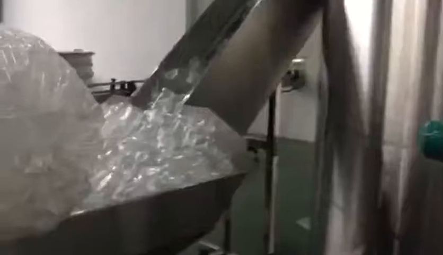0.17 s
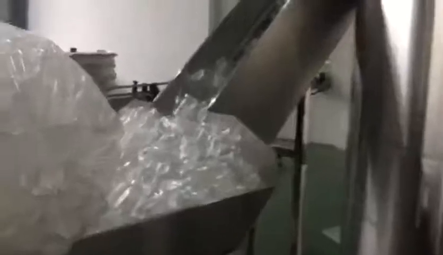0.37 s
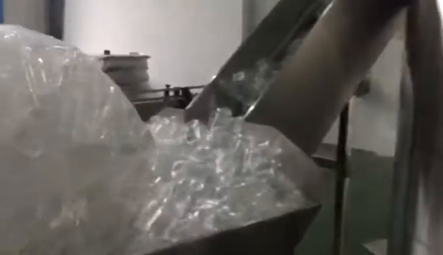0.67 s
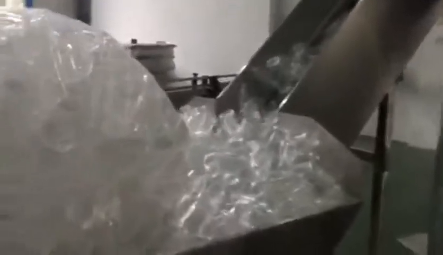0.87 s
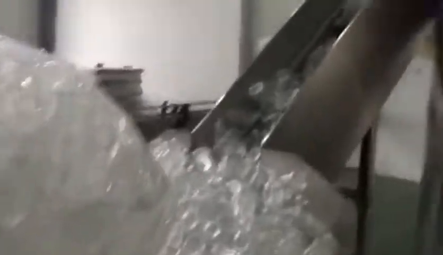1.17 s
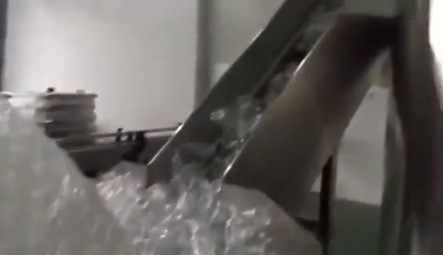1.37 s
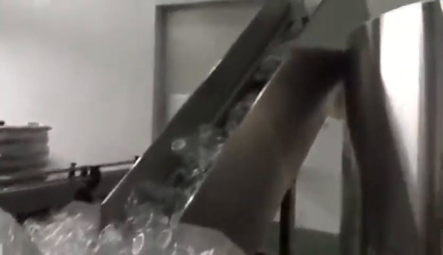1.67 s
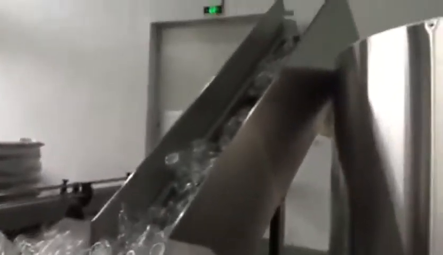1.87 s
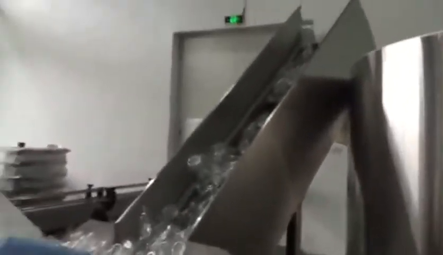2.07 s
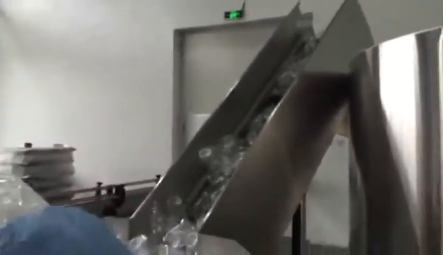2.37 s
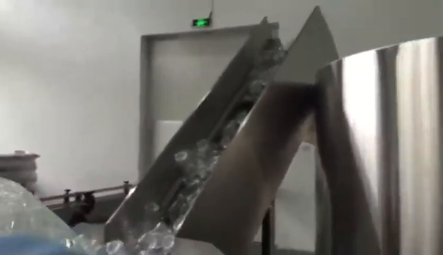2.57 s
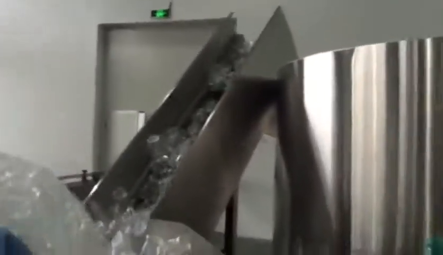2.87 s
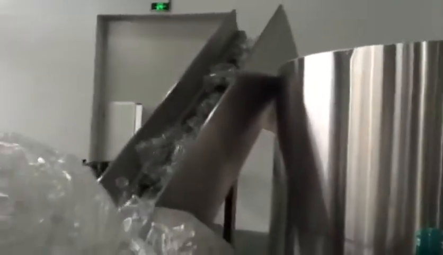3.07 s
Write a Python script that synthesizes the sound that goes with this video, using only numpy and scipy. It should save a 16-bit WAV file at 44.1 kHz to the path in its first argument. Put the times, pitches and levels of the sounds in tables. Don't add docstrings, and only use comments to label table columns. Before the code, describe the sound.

Hollow plastic bottles clatter and knock against ringing sheet steel in an echoing, roaring factory hall

```python
import sys
import numpy as np
from scipy import signal
from scipy.io import wavfile
from scipy.ndimage import uniform_filter1d

SR = 44100
rng = np.random.default_rng(int(sys.argv[2]) if len(sys.argv) > 2 else 0)


def transcribe(u):
    v = np.clip(np.atleast_2d(u).T, -1, 1)
    q = np.round(v * 32767).astype(np.int16)
    wavfile.write(sys.argv[1], SR, q)


def volts(x):
    e = np.asarray(x, float) / 20
    return 10 ** e


N = 141561


def evened(x):
    return x / np.sqrt(np.mean(x ** 2) + 1e-20)


def read(points, hz):
    f, value = np.transpose(points)
    return np.interp(np.log(hz + 1), np.log(f + 1), value)


def bursts(times, db, t60):
    t = np.arange(N) / SR - np.array(times)[:, None]
    on = t > 0
    on[0] = True
    decay_db = np.array(db)[:, None] - 60 * np.maximum(t, 0) / t60
    power = on * volts(2 * decay_db)
    return np.sqrt(power.sum(0))


def train(per_s, spread_db):
    chance, side, size = rng.random((3, N))
    click = (chance < per_s / SR) * np.sign(side - .5)
    return click * volts(spread_db * np.minimum(-np.log(size + 1e-9), 4))


def ring(modes, per_s, spread_db, strength, blows=0):
    detune = .012
    t, out = np.arange(SR // 3) / SR, np.zeros(N)
    for spot in range(10):
        mix = rng.standard_normal((len(modes), 2))
        body = np.zeros(len(t))
        for (hz, db, t60), (a, b) in zip(modes, mix):
            decay = volts(db - 60 * t / np.clip(t60, .05, .32))
            tone = np.sin(2 * np.pi * hz * (1 + detune * b) * t)
            body += (np.sign(a) + 0.29 * a) * decay * tone
        hits = train(per_s / 10, spread_db) + blows * rng.choice([-1, 1], N)
        out += signal.fftconvolve(hits * strength, body / np.linalg.norm(body))[:N]
    return out / np.sqrt(per_s / SR) / 2


# pitch_hz, level_db (per Hz)
ROAR_SPECTRUM = [(15, -51), (25, -15.5), (163, 0), (265, 5), (454, -4.5), (702, -1.5), (1640, -7),
                 (4340, -8.5), (11500, -16.5), (15000, -52), (22000, -120)]
ROAR_DB = -17.5


def roar():
    frames, hz = N // 128 + 5, np.fft.rfftfreq(512, 1 / SR)
    a, b, patches = rng.standard_normal((frames, 257, 3)).T
    patches = evened(uniform_filter1d(uniform_filter1d(patches, 6, 0), 24, 1))
    flicker = evened(uniform_filter1d(rng.standard_normal(frames), 12))
    level_db = read(ROAR_SPECTRUM, hz)[:, None] + 1.7 * patches + 0.42 * flicker
    noise = signal.istft((a + 1j * b) * volts(level_db), nperseg=512, noverlap=384)[1][:N]
    return volts(ROAR_DB) * evened(noise)


# start_s, peak_db, body_hz
CLOSE_KNOCKS = [(.6347, -24, 2140), (.7544, -18, 2500), (.775, -14.5, 2380), (1.043, -14, 2540),
                (1.1146, -17.5, 5240), (1.119, -11, 1090), (1.2935, -13.5, 3200), (1.3211, -20, 2110),
                (1.6695, -17.5, 2410), (1.9277, -16.5, 1820), (1.93, -16.5, 5800), (2.03, -18, 3000),
                (2.2111, -21, 3244), (2.3734, -15, 1590), (2.597, -21, 1740), (2.6396, -22, 2480),
                (2.7529, -21, 2050), (2.92, -25, 3150), (3.0949, -14, 1910), (3.1415, -20, 2180),
                (.110, -10.5, 700), (1.345, -15, 2600), (1.364, -21, 2000), (1.965, -20, 5540),
                (2.001, -16.5, 5560), (2.397, -12.5, 607), (2.312, -14, 1300), (.42, -16, 2300)]
CLOSE_T60_S, CLOSE_WIDTH = 0.078, 1.22


def knocks():
    t, out = np.arange(SR // 8) / SR, np.zeros(N + SR)
    for s, db, hz in CLOSE_KNOCKS:
        edges = [hz / CLOSE_WIDTH, hz * CLOSE_WIDTH]
        band = signal.butter(2, edges, "band", fs=SR, output="sos")
        rattle = evened(signal.sosfilt(band, rng.standard_normal(len(t))))
        out[round(s * SR):][:len(t)] += rattle * volts(db - 60 * t / CLOSE_T60_S)
    return out[:N]


# start_s, peak_db, thin_against_thick_walls_db
BANGS = [(0.116, -10.5, 1), (0.226, -10, -4), (0.328, -8.5, 4.5), (0.481, -37, -11), (0.626, -16, 9.5),
         (0.73, -21, 15), (0.94, -17, -10), (1.118, -4, -3), (1.199, -8.5, 1), (1.32, -3, 1.5),
         (1.499, -7.5, 1), (1.64, -6, 0.5), (1.689, -23, -5), (1.781, -5.5, -1), (1.937, -2.5, -3),
         (1.963, -26, 6), (2.008, -23, -14), (2.053, -15, -8), (2.19, -9.5, -3), (2.327, -3.5, 0),
         (2.369, -15.5, -17), (2.46, -4.5, 3), (2.52, -9, 0), (2.606, -6, -8), (2.773, -6, -1.5),
         (2.849, -10.5, 4), (2.89, -10, -1), (3.09, -7.5, -1.5)]
# time_s, level_db
LOAD = [(0.12, -18), (0.26, -53), (0.4, -19), (0.43, -47), (1.09, -40), (1.14, -22), (1.61, -20),
        (1.7, -14), (1.75, -22), (1.91, -16), (1.98, -18), (2.03, -31), (2.08, -26), (2.38, -15.5),
        (2.78, -27.5), (2.88, -12), (3.09, -40), (3.2, -10.5)]
# pitch_hz, level_db, t60_s
WALL_MODES = [(425, -7, 0.14), (523, -3, 0.2), (581.2, -7.5, 0.21), (603.7, 0.5, 0.074), (701.3, 0.5, 0.39),
              (731, -13, 0.45), (765, -7, 0.6), (840, 2, 0.087), (917.8, -1, 0.22), (982, 3, 0.073),
              (1073, 0.5, 0.038), (1247, -11.5, 0.37), (1261, -6.5, 0.17), (1319, -9, 0.38)]
# pitch_hz, level_db, t60_s
PANEL_MODES = [(140.5, 1, 0.31), (168.4, -1.5, 0.43), (194.4, -3, 0.18), (228.6, 0, 0.33), (246, 5.5, 0.1),
               (291.8, 2.5, 0.24), (346, -5.5, 0.083)]
KNOCKS_PER_S, KNOCK_DB, BANG_DB, BANG_T60_S, DRUM_DB = 500, -31.5, -15.5, 0.3, -5
STRIKE = 2.98


def steel():
    s, db, thin_db = np.transpose(BANGS)
    blows = np.zeros(N)
    blows[(s * SR).astype(int) + 2] = STRIKE / np.sqrt(10)
    walls = np.zeros(N)
    for thinness, modes in ((-0.79, WALL_MODES[:4]), (-0.24, WALL_MODES[4:8]), (0.97, WALL_MODES[8:])):
        bangs = bursts(s, db + BANG_DB + thinness * thin_db, BANG_T60_S)
        walls += ring(modes, KNOCKS_PER_S, 1.96, np.hypot(volts(KNOCK_DB), bangs), blows)
    s, db = np.transpose(LOAD)
    drumming = volts(DRUM_DB + np.interp(np.arange(N) / SR, s, db))
    return walls + ring(PANEL_MODES, 250, 1.95, drumming)


def thuds():
    thud_db, t60_s = -6.5, 0.079
    s, db, _ = np.transpose(BANGS)
    band = signal.butter(2, [220, 1400], "band", fs=SR, output="sos")
    grain = signal.sosfilt(band, rng.standard_normal(N))
    return evened(grain) * bursts(np.r_[0, s], np.r_[-99, db + thud_db], t60_s)


# start_s, peak_db, brightness_db (raises the highest clacks, lowers
SLIDES = [(0.1171, -12, 6.5), (0.198, -5, 0), (0.308, -6, -1), (0.409, -7.5, 3.5), (0.4975, -17.5, 10.5),
          (0.621, -8.5, 1), (0.759, -9, -3), (0.98, -15, -9), (1.1156, -7.5, -2), (1.307, -8.5, -2),
          (1.4494, -19, 10), (1.568, -10.5, -4), (1.791, -8.5, 1.5), (1.924, -5.5, 2), (2.0177, -8.5, 0.5),
          (2.1394, -16, 2), (2.277, -8.5, -3), (2.3094, -16, 3), (2.5794, -30.5, -18), (2.7794, -13, 0),
          (2.931, -13, -4), (3.114, -9.5, -3.5)]
# pitch_hz, level_db (per Hz)
CLACK_SPECTRUM = [(710, -34), (1200, -4), (1340, 1.5), (1420, -29), (1690, 0.5), (3300, -0.5), (4820, -4),
                  (5200, -3.5), (11500, -17), (15000, -46), (22000, -120)]
CLACKS_PER_S, CLACK_SPREAD_DB = 6000, 2.2
CLACK_DB, SLIDE_T60_S, SLIDE_DB = -27.5, 0.6, -8.5


def clatter():
    s, db, tilt_db = np.transpose(SLIDES)
    out, t = np.zeros(N), np.arange(600) / SR
    pitches = np.geomspace(1100, 11500, 24)
    share = volts(read(CLACK_SPECTRUM, pitches)) * np.sqrt(pitches)
    dull, bright = (np.hypot(volts(CLACK_DB), bursts(s, db + SLIDE_DB + side * tilt_db, SLIDE_T60_S))
                    for side in (-1, 1))
    for k, hz in enumerate(pitches):
        clack = np.sin(2 * np.pi * hz * t) * np.exp(-t * hz / 2.4)
        swell = dull + (bright - dull) * k / 23
        part = signal.oaconvolve(train(CLACKS_PER_S / 24, CLACK_SPREAD_DB), clack)[:N]
        out += share[k] * evened(part) * swell
    return out / np.linalg.norm(share)


# start_s, length_s, pitch_hz, level_db
SINGING = [(1.98, 0.36, 608, -28), (2.1, 0.14, 613, -22), (2.26, 0.26, 579, -24), (2.43, 0.16, 721, -20.5),
           (2.84, .17, 745, -20.5), (1.29, .14, 780, -27), (2.34, 0.42, 531, -26.5), (2.32, .17, 219, -22),
           (2.08, 0.25, 245, -27), (2.24, 0.11, 299, -21), (1.8, .14, 270, -25), (1.65, .09, 371, -22.5),
           (1.4, .1, 640, -23), (1.59, 0.13, 1200, -26.5), (1.74, 0.16, 244, -28), (1.95, .13, 180, -22),
           (2.34, .2, 162, -28.5), (2.55, 0.22, 286, -25), (2.54, 0.18, 691, -28), (3.1, 0.25, 219, -24),
           (1.1, 0.23, 691, -26.5), (1.16, 0.11, 972, -25), (1.04, 0.16, 310, -25),
           (1.27, 0.33, 549, -26.5), (2.05, 0.24, 534, -28.5), (0.13, 0.11, 740, -25.5),
           (.31, .1, 715, -25), (2.65, 0.11, 889, -22), (1.93, .1, 822, -24), (3.3, 0.14, 295, -25.5),
           (1.32, 0.24, 240, -28), (0.7, .16, 222, -27.5), (2.29, 0.25, 1200, -25.5),
           (2.46, 0.12, 578, -22)]
SING_WANDER_RAD, SING_FLUTTER_DB, SING_DB = .8, 3.5, -2.5


def singing():
    t, out = np.arange(N) / SR, np.zeros(N)
    for s, length, hz, db in SINGING:
        wander, flutter = (evened(uniform_filter1d(uniform_filter1d(v, size=500), size=500))
                           for v in rng.standard_normal((2, N)))
        tone = np.sqrt(2) * np.sin(2 * np.pi * hz * t + SING_WANDER_RAD * wander)
        swell = np.sqrt(np.sin(np.pi * np.clip((t - s) / length, 0, 1)).clip(0))
        out += volts(db + SING_DB + SING_FLUTTER_DB * flutter) * tone * swell
    return out


def hall(x):
    t60_s = 1
    at, out = np.arange(200, SR - 20, 20), np.zeros(N)
    spot = rng.integers(0, 4, N // 1024 + 1).repeat(1024)[:N]
    for k in range(4):
        taps = np.zeros(SR)
        taps[at + rng.integers(0, 20, len(at))] = rng.choice([-1., 1.], len(at))
        hz, t, z = signal.stft(taps, SR, nperseg=256)
        decay = volts(-60 * t * (1 + hz[:, None] / 6000) / t60_s)
        tail = signal.istft(z * decay, SR, nperseg=256)[1]
        here = np.sqrt(abs(uniform_filter1d((spot == k) * 1., size=512)))
        out += signal.fftconvolve(x * here, tail / np.linalg.norm(tail))[:N]
    return out


def scene():
    steel_direct_db, hall_db = 1.5, -0.5
    walls, bottles = steel(), clatter() + thuds()
    near = volts(steel_direct_db) * walls + bottles + volts(hall_db) * hall(walls + bottles)
    near = near / np.hypot(1, volts(hall_db))
    return np.tile(near + roar() + singing() + knocks(), (2, 1))


# start_s, length_s, level_db
DULL = [(0.152, 0.097, -5), (0.408, 0.048, -4), (0.55, 0.14, -1), (0.834, 0.14, -1.5), (1.045, .1, -1),
        (1.274, 0.078, -1.5), (1.65, 0.068, -2), (1.87, 0.05, -3.5), (2.39, 0.053, -5), (2.774, 0.11, -4)]
# start_s, length_s, pitch_hz, width_hz
HOLES = [(1.57, .055, 3850, 400), (1.6, .06, 2600, 250), (1.65, .06, 1600, 120), (1.95, .055, 3750, 380),
         (1.95, .035, 2350, 400), (1.99, .03, 5000, 300), (1.95, .025, 1850, 120), (2.138, .05, 3430, 300),
         (2.14, .055, 2800, 230), (1.95, .03, 3000, 170), (2.26, .035, 3700, 200), (2.19, .05, 2450, 150),
         (2.53, .06, 3050, 250), (2.575, .055, 2830, 250), (2.74, .008, 4600, 1400),
         (2.412, .014, 5600, 500), (1.46, .02, 3050, 250), (1.475, .02, 4900, 250), (2.67, .04, 4100, 200),
         (2.69, .016, 4950, 400), (2.89, .03, 3800, 250), (3.01, .065, 3000, 220), (3.108, .04, 2970, 260)]
# pitch_hz, width_hz, depth_db
DIPS = [
    (4900, 150, -1.3),
    (7600, 200, -1.8),
    (10450, 250, -2.2),
]
TOP_HZ, EDGE_HZ, WIDE_HZ, WIDE_DB, RAGGED_HZ = 7050, 11650, 12100, -1.5, 120
HOLE_DB, STRAY_HOLES, STRAY_DB, MORE_HOLES_FROM_S = -32, .07, -16, 1.5


def shifting_bands(x):
    hz, t, z = signal.stft(x, SR, nperseg=1024, noverlap=896)
    hz, db = hz[:, None], np.zeros(z.shape)
    wide = np.zeros(len(t))
    for s, length, dull_db in DULL:
        now = (t > s) & (t < s + length)
        db += dull_db * now * np.clip((hz - TOP_HZ) / 200, 0, 1)
        wide += now
    for s, length, mid_hz, width_hz in HOLES:
        now = (t > s) & (t < s + length)
        db += HOLE_DB * (now & (abs(hz - mid_hz) < width_hz / 2))
    cells = rng.random((len(t) // 10 + 1, len(hz) // 3 + 1))
    cells = cells.repeat(10, 0).repeat(3, 1).T[:len(hz), :len(t)]
    frequency_share = np.where((t > MORE_HOLES_FROM_S) & (hz < 4200), 1, .1)
    db += STRAY_DB * (cells < STRAY_HOLES * frequency_share) * (hz > 1400)
    for mid_hz, width_hz, dip_db in DIPS:
        db += 4 * dip_db * cells ** 3 * (abs(hz - mid_hz) < width_hz / 2)
    ragged = RAGGED_HZ * rng.standard_normal(len(t) // 10 + 1).repeat(10)[:len(t)]
    edge = np.where(wide > 0, WIDE_HZ, EDGE_HZ) + ragged
    db += WIDE_DB * np.clip((hz - EDGE_HZ + 400) / 500, 0, 1)
    db -= 70 * np.clip((hz - edge) / 300, 0, 1)
    return signal.istft(z * volts(db), SR, nperseg=1024, noverlap=896)[1][:N]


def low_pass(x):
    return signal.sosfilt(signal.butter(12, 12650, fs=SR, output="sos"), x)


def record(dry):
    bass_cut_hz, limit = 58, 1.3
    start_s, fade_in_s = 0.1058, 0.0037
    gap_s, gap_width_s, gap_db = 2.748, 0.0051, -5
    t = np.arange(N) / SR
    x = signal.sosfilt(signal.butter(2, bass_cut_hz, "high", fs=SR, output="sos"), dry[0])
    over = np.maximum(abs(x) - limit / 2, 0)
    x = x - np.sign(x) * (over - .3 * np.tanh(over / .3))
    x = shifting_bands(x)
    x = x * np.clip((t - start_s) / fade_in_s, 0, 1)
    x = x * volts(gap_db * np.exp(-((t - gap_s) / gap_width_s) ** 2))
    return low_pass(np.tile(x, (2, 1)))


dry = scene()
out = record(dry)
transcribe(out)
```